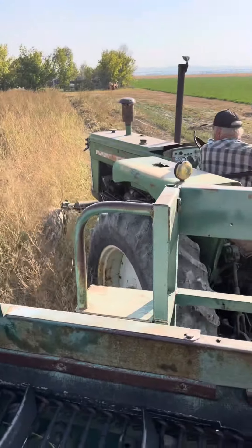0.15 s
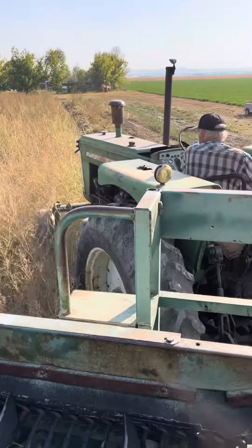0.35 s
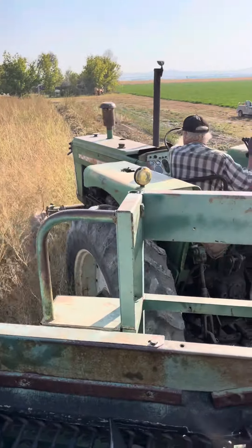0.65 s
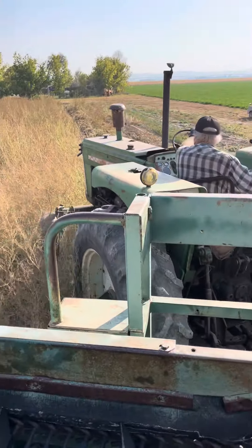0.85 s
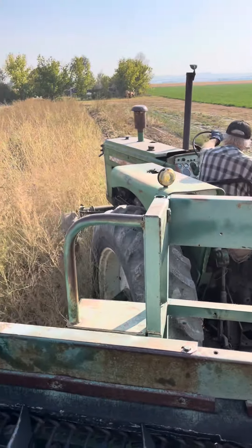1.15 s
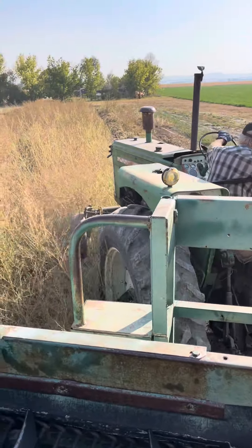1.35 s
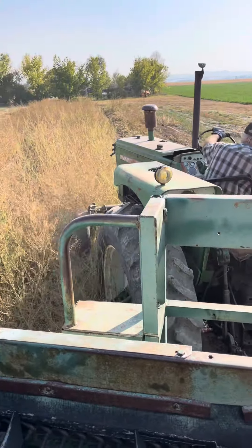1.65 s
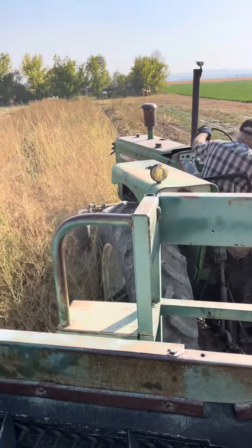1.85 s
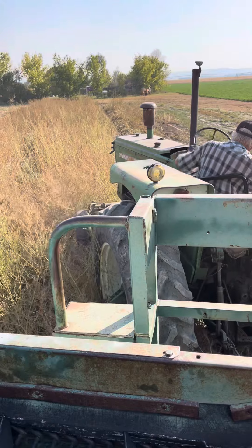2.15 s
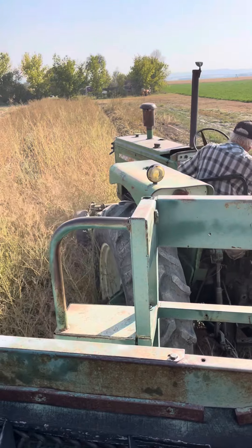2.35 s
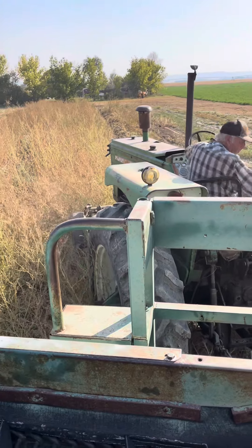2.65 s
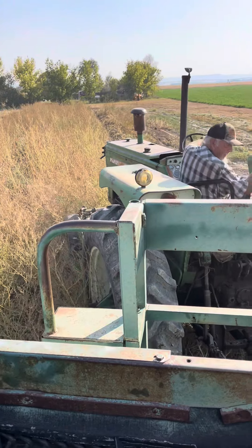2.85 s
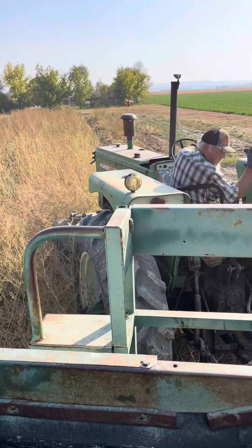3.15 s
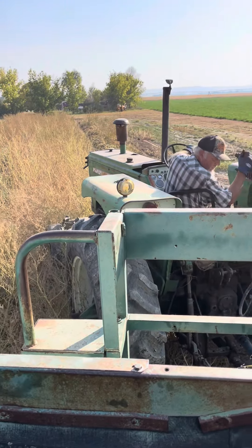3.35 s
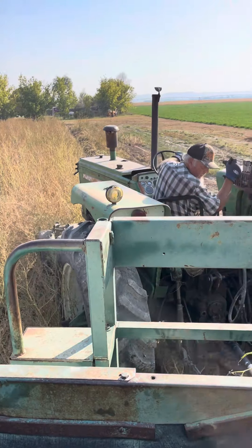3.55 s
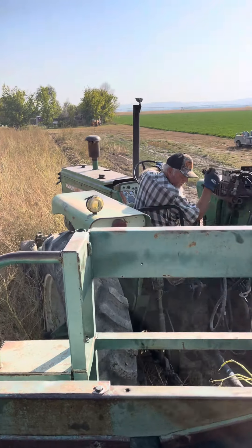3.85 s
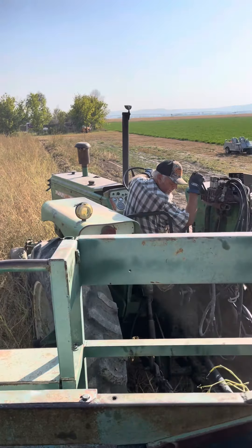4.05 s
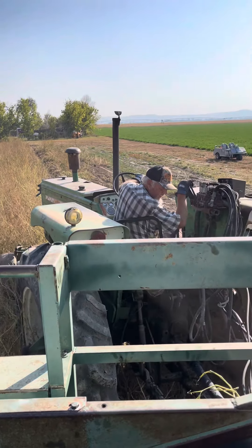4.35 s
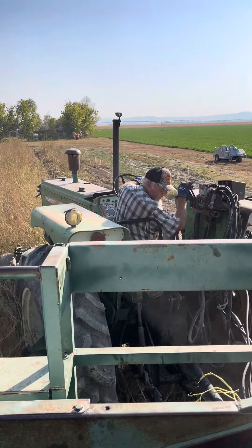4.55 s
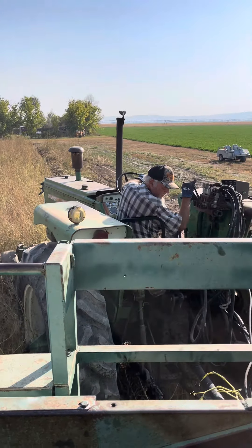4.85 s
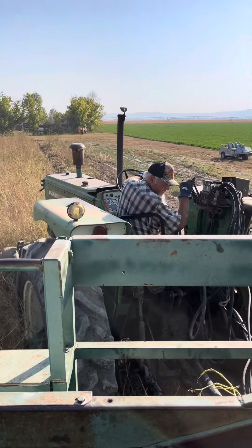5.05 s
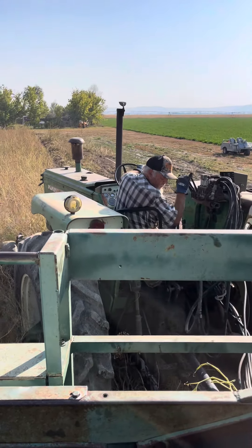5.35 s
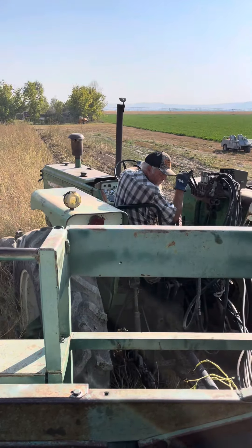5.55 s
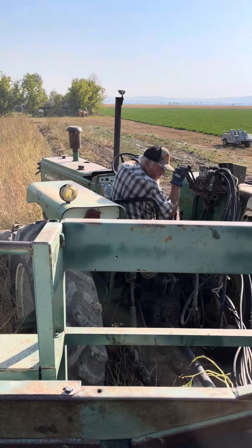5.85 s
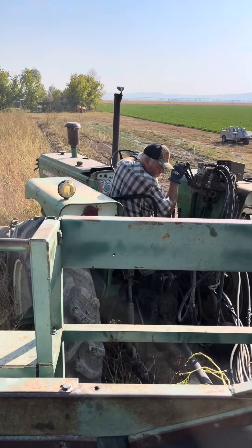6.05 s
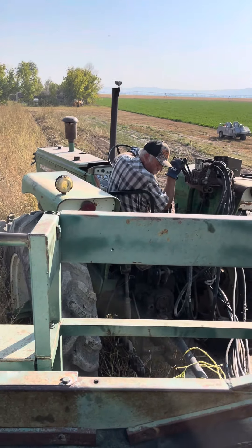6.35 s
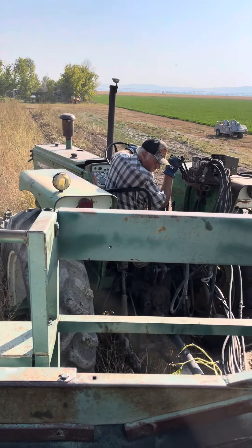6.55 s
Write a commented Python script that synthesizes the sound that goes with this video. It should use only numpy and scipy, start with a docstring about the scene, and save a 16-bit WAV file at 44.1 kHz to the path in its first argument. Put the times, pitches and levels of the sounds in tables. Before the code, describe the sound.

Steady, rough engine drone with fast uneven firing knocks, a hissing, chirping manifold leak and humming shaft. Sheet metal slaps early, the noise dips, then grows. A deep exhaust boom lasts under a second midway, faint joint squeaks follow, and a plate clanks with a hollow thump near the end. Close stereo microphone on the machine, outdoors and dry.

```python
"""An old six-cylinder tractor engine drones and throbs as it pulls a harvester, heard from the harvester's deck.
Sine waves and puffs of noise make the exhaust, which twice swells to a boom; firings knock in the block.
A leaking manifold chirps with falling tones and hisses in puffs of noise; shaft, fan and bearing hum as tones.
Random taps make the chain rattle, the stalks rustle and the loose covers chatter over rumbling, drumming noise.
The covers also slap, a dry joint squeaks, and near the end a plate clanks and the hopper thumps."""
import sys
import numpy as np
from scipy import signal
from scipy.fft import rfft, irfft, next_fast_len
from scipy.io import wavfile
from scipy.ndimage import uniform_filter1d

SR = 44100
rng = np.random.default_rng(int(sys.argv[2]) if len(sys.argv) > 2 else 0)


def store_wav(level_fs):
    """Save 16-bit WAV to argv[1]."""
    pcm = np.round(np.clip(np.atleast_2d(level_fs), -1, 1) * 32767)
    wavfile.write(sys.argv[1], SR, pcm.T.astype(np.int16))


N = 294837   # length in samples


def from_db(db):
    """Turn decibels into gain."""
    return 10 ** (np.asarray(db) / 20)


def mid_one(x):
    """Scale so that the mean of the channels has rms 1."""
    return x / np.sqrt(np.mean(np.atleast_2d(x).mean(0) ** 2) + 1e-20)


def in_time(rows):
    """Draw each column of a timed table as a curve, sample by sample."""
    start_s, *columns = np.transpose(rows)
    return [np.interp(np.arange(N) / SR, start_s, column) for column in columns]


def at_hz(points, hz):
    """Read a table by pitch, on a logarithmic pitch axis."""
    table_hz, value = np.transpose(points)
    return np.interp(np.log(hz + 1e-3), np.log(table_hz), value)


def drift(rate_hz):
    """Smooth random wandering of spread 1: noise smoothed twice, at one value per 40 samples."""
    step = 40
    memory = np.exp(-2 * np.pi * rate_hz * step / SR)
    noise = rng.standard_normal(N // step + 2002)
    slow = signal.lfilter([1], [1, -2 * memory, memory * memory], noise)[2000:]   # skip the settling
    return np.interp(np.arange(N) / step, np.arange(len(slow)), mid_one(slow))


def panned(left_db):
    """Left and right gains whose mean is 1; positive values favour the left."""
    gains = from_db(np.array([[.5], [-.5]]) * left_db)
    return gains / gains.mean(0)


# how far the left channel leads the right: pitch_hz, lead_rad
CHANNEL_LEAD = [(60, -.3), (76, -.45), (100, -.7), (150, -1.4), (240, -1.7), (340, -1.4), (460, -.5),
                (620, -.7), (800, 0), (2000, 0), (2600, 1.5), (4000, .6), (4600, 1.7), (5100, 4.6),
                (5700, 6.2), (6750, 6.4), (7670, 8.1), (8400, 9.3), (9500, 9.44), (10200, 10.2),
                (10600, 10.9), (11400, 11.5), (11900, 12.5)]


def channel_lead(hz):
    """Sound reaches the two channels out of step: half the lead goes to each side."""
    return at_hz(CHANNEL_LEAD, hz) * np.array([[.5], [-.5]])


# how alike the left and right channels are made: pitch_hz, likeness (0-1, share of power)
CHANNEL_LIKENESS = [(60, .99), (140, .85), (250, .88), (440, .35), (560, .6), (800, .85), (960, .62),
                    (1450, .99), (2000, .98), (2600, .72), (4200, .7), (4900, .8), (5800, .98), (7400, .8),
                    (8200, .88), (8700, .999), (9500, .999), (10200, .85), (11800, .97)]


def radiate(force, colour, envelope=1):
    """Colour a force and send it to both channels, along with scattered sound of the same envelope."""
    size = next_fast_len(N, True)
    hz = np.arange(size // 2 + 1) * SR / size
    alike = np.clip(at_hz(CHANNEL_LIKENESS, hz), 0, 1)
    direct = rfft(mid_one(force) * envelope, size) * np.exp(1j * channel_lead(hz))
    scattered = rfft(rng.standard_normal((2, N)) * envelope, size)
    mixed = np.sqrt(alike) * direct + np.sqrt(1 - alike) * scattered
    # fade out beyond both ends of the colour table
    lowest_hz, highest_hz = colour[0][0], colour[-1][0]
    skirts = 1 / (1 + (hz / highest_hz) ** 4) / (1 + (lowest_hz / (hz + 1)) ** 4)
    gain = from_db(at_hz(colour, hz)) * skirts
    return mid_one(irfft(mixed * gain, size)[:, :N])


def tone(hz, level_db):
    """A sine of moving pitch, out of step between the two channels."""
    phase = 2 * np.pi * (np.cumsum(hz) / SR + rng.random())
    return np.sqrt(2) * from_db(level_db) * np.sin(phase + channel_lead(np.mean(hz)))


def ring(force, hz, t60_s):
    """A unit click sets a sine of height 1 ringing, which falls by 60 dB in t60_s."""
    decay, turn = from_db(-60 / (t60_s * SR)), 2 * np.pi * hz / SR
    return signal.lfilter([0, np.sin(turn)], [1, -2 * decay * np.cos(turn), decay * decay], force + 1e-18)


def struck(clicks, modes, scatter_db):
    """Every touch rings all the modes, each with a random strength of its own."""
    out, at = np.zeros(N), np.flatnonzero(clicks)
    chance = rng.standard_normal((len(at), len(modes)))
    for k, (hz, db, t60_s) in enumerate(modes):
        force = np.zeros(N)
        force[at] = clicks[at] * from_db(db + scatter_db * chance[:, k]) * (-1) ** k   # signs alternate
        out += ring(force, hz, t60_s)
    return out


def blows(rows):
    """Make one train of clicks for each level column of a table of blows."""
    start_s, *levels_db = np.transpose(rows)
    clicks = np.zeros((len(levels_db), N))
    clicks[:, (start_s * SR).astype(int)] = from_db(levels_db)
    return clicks


def taps(per_s, spread_db, most=3):
    """Random touches of uneven strength and either sign."""
    sizes = from_db(spread_db * np.minimum(rng.exponential(1, N), most)) * rng.choice([-1, 1], N)
    return (rng.random(N) < per_s / SR) * sizes


# relative strength of the six cylinders in firing order: level_db
CYLINDER_DB = [-3.5, 3, 4, -3.5, -5, 2.5]
HALF_CYLINDER_DB = .5 * np.array(CYLINDER_DB)   # a milder pattern for the knock and the chain


def bursts(firings, centre, width, depth, scatter_db, pattern_db=CYLINDER_DB):
    """One burst per firing over a steady bed; centre and width are shares of the firing period."""
    turn = firings - centre + 2.5   # the 2 keeps the count positive
    which, offset = turn.astype(int), turn % 1 - .5
    chance = rng.standard_normal(size=1024)
    strength = from_db(np.array(pattern_db)[(which - 2) % len(pattern_db)] + scatter_db * chance[which])
    return np.sqrt(1 + (depth * strength) ** 2 * np.exp(-(offset / width) ** 2))


def cyclic_force(firings, repeat, size=3500):
    """The same parts collide in every engine cycle, so a share of the force repeats; the rest is fresh."""
    place = firings / len(CYLINDER_DB) % 1 * size
    loop = np.interp(place, np.arange(size), rng.standard_normal(size))
    return np.sqrt(repeat) * mid_one(loop) + np.sqrt(1 - repeat) * rng.standard_normal(N)


# engine speed: start_s, firings_per_s
ENGINE_SPEED = [(0, 75.35), (1, 76.0), (2.2, 75.85), (2.8, 76.18), (3.4, 75.5), (4.9, 75.35), (5.5, 76.14),
                (6.69, 75.35)]


def engine_firings():
    """Count the firings so far, in fractions, by adding up the engine speed."""
    return .1 + np.cumsum(in_time(ENGINE_SPEED)[0]) / SR


# exhaust lines: multiple of the six-firing cycle, level_db (about the exhaust level)
EXHAUST_LINES = [(4, -22), (6, 4), (7, -17.5), (8, -13.5), (9, -11.5), (10, -13), (11, -34), (12, -5),
                 (13, -25), (14, -22.5), (15, -1.5), (16, -13), (18, -7), (19, -8.5), (20, -10), (24, -9)]
FIRING_WAVER, OVERTONE_WAVER = .05, .15   # wavering of the firing line and of the others (share, and radians)
BOOM_TOP_HZ = 182


def exhaust(firings, level_db, boom_db, overtone_share=0.22, left_db=-1.2):
    """The firing line leads; unequal cylinders add lines at multiples of the cycle, which make it throb."""
    out, cycle = np.zeros((2, N)), firings / len(CYLINDER_DB)
    for order, db in EXHAUST_LINES:
        hz = order * ENGINE_SPEED[0][1] / len(CYLINDER_DB)
        follow = 1 if hz < BOOM_TOP_HZ else overtone_share
        share = FIRING_WAVER if order == len(CYLINDER_DB) else OVERTONE_WAVER
        waver, slip = 1 + share * drift(6.0), share * drift(6.5)
        gain = from_db(db + level_db + follow * boom_db) * waver
        phase = 2 * np.pi * (order * cycle + rng.random()) + slip
        out += gain * np.sin(phase + channel_lead(hz))
    return np.sqrt(2) * out * panned(left_db)


# colour of the ragged gas at the stack: pitch_hz, level_db (relative, per Hz)
BLAST_COLOUR = [(45, -3), (75, -2), (120, -4), (165, -6), (200, 7), (245, -10)]


def blast(firings, level_db):
    """Gas leaves the stack in ragged puffs, which roughen the drone and roar in a boom."""
    puff = bursts(firings, centre=.5, width=.3, depth=1.5, scatter_db=2.5)
    return from_db(level_db) * radiate(rng.standard_normal(N), BLAST_COLOUR, puff)


# speed of the harvester's shaft: start_s, turns_per_s
SHAFT_SPEED = [(0, 31.5), (0.8, 31.7), (1.5, 32.35), (2.6, 31.8), (3.6, 31.95), (5.5, 32.15), (6.3, 32.1),
               (6.69, 31.5)]
# hum of the shaft: multiple of a turn, level_db (about the exhaust)
SHAFT_LINES = [(2, -7.5), (3, -3.5), (4, -13.5)]


def drive(exhaust_db, rumble_db):
    """The harvester's shaft and fan hum against the exhaust; a bearing whines thinly."""
    turns_hz, = in_time(SHAFT_SPEED)
    shaft = sum(tone(order * turns_hz, exhaust_db + db) for order, db in SHAFT_LINES)
    fan = tone(194.5 + 2.2 * drift(4), rumble_db - 1.2 + 2.5 * drift(3))
    bearing = tone(8266 + 6 * drift(6), -62 + 3 * drift(3))[0]   # the same on both sides
    return shaft + fan + bearing


# colour of the rumble: pitch_hz, level_db (relative, per Hz)
RUMBLE_COLOUR = [(20, -17), (40, -28), (62, -19), (100, -11), (150, -1), (200, 1.5), (240, 1.5),
                 (280, -8.5), (420, -19)]


def rumble(firings, level_db):
    """Low noise, a small share of which repeats in every engine cycle."""
    return from_db(level_db) * radiate(cyclic_force(firings, repeat=0.12), RUMBLE_COLOUR)


# drumming of the sheet-metal panels: start_s, level_db, left_right_db (positive is left)
PANEL_DRUMMING = [(0.0, -38.5, 2), (0.95, -46.5, 3), (1.15, -54, -4), (1.45, -54.5, -19), (2.0, -40.5, -12),
                  (2.9, -36, -8), (3.5, -36.5, -4), (4.05, -44, 5), (4.6, -44, 1), (5.0, -33.5, 0),
                  (5.5, -35, 3), (6.69, -28, 2.5)]
# colour of the panels: pitch_hz, level_db (relative, per Hz)
PANEL_COLOUR = [(190, 2.5), (270, 2.5), (320, -1), (385, 4), (440, -5.5), (510, -0.5), (600, -5)]


def panels(firings):
    """Sheet-metal panels drum along with the engine cycle."""
    level_db, left_db = in_time(PANEL_DRUMMING)
    drumming = radiate(cyclic_force(firings, repeat=0.37), PANEL_COLOUR)
    return from_db(level_db) * drumming * panned(left_db)


# colour of the machine's body: pitch_hz, level_db (relative, per Hz)
BODY_COLOUR = [(350, -51), (450, -21), (510, 1.5), (570, 0.5), (640, 1.5), (700, -0.5), (790, 1), (880, 1),
               (960, -3), (1200, -12)]


def body(firings, level_db):
    """The body rattles as noise with a slight thud at each firing."""
    thud = bursts(firings, centre=0.44, width=0.45, depth=0.13, scatter_db=3.0)
    return from_db(level_db) * radiate(cyclic_force(firings, repeat=0.25), BODY_COLOUR, thud)


# level of the combustion knock: start_s, level_db (before the jolts)
KNOCK_LEVEL = [(0.0, -31), (0.6, -33), (1.25, -36.7), (1.5, -36), (1.9, -30.5), (2.6, -30.5), (3.4, -29.5),
               (4.1, -29), (4.6, -31), (5.0, -28.5), (5.55, -31), (5.85, -29.5), (6.69, -29)]
# colour of the knock: pitch_hz, level_db (relative, per Hz)
KNOCK_COLOUR = [(750, -42), (950, -28), (1010, -3), (1070, 1.5), (1155, 6), (1220, -1.5), (1370, 3),
                (1700, 1.5), (2150, -1.5), (2500, -5.5), (3100, -15.5), (4500, -21)]


def knock(firings, jolts_db):
    """Combustion knocks in the block, one burst of noise per firing."""
    level_db = in_time(KNOCK_LEVEL)[0] + jolts_db
    burst = bursts(firings, centre=.46, width=.24, depth=.9, scatter_db=.7, pattern_db=HALF_CYLINDER_DB)
    return from_db(level_db) * radiate(cyclic_force(firings, repeat=0.22), KNOCK_COLOUR, burst)


# ringing of the steel frame: pitch_hz, level_db (relative), t60_s
FRAME_MODES = [(368, -18, 0.083), (510, 3.5, 0.12), (548, 10.5, 0.027), (661, 6, 0.1), (753, 2.5, 0.035),
               (1005, 1, 0.18), (1175, 2.5, 0.06), (1290, 2, 0.17), (1381, -8, 0.032), (1650, -10, 0.033),
               (1710, -9, 0.014), (1880, -15, 0.014), (2243, 6.5, 0.032), (2626, -2, 0.068)]


def chain(firings):
    """Conveyor links tap the frame, mostly when a firing shakes them."""
    shake = bursts(firings, centre=.48, width=.2, depth=2.5, scatter_db=1, pattern_db=HALF_CYLINDER_DB) ** 2
    touches = taps(per_s=150 * shake / shake.mean(), spread_db=4)
    return mid_one(struck(touches, FRAME_MODES, scatter_db=4.5))


BODY_DB, BODY_FOLLOWS = -34.5, 0.59           # level at the usual effort, rise in dB per dB of effort
BODY_PAN_DB, BODY_PAN_FOLLOWS = -4.5, -0.45   # left-right balance: further right under effort


def clatter(firings, effort_db, jolt_db=0.7):
    """Panels, body, chain and block sound together, driven by the firings."""
    body_db = BODY_DB + BODY_FOLLOWS * effort_db
    jolts_db = jolt_db * drift(17.0)   # uneven ground shakes body and block together
    rattle = body(firings, body_db + jolts_db) + from_db(body_db - 3) * chain(firings)
    rattle_pan = panned(BODY_PAN_DB + BODY_PAN_FOLLOWS * effort_db)
    return panels(firings) + rattle * rattle_pan + knock(firings, jolts_db) * panned(-0.37)


# chatter of two loose covers: start_s, low_cover_level_db, bright_cover_level_db
COVER_CHATTER = [(0.0, -30, -31.5), (0.25, -34, -35), (0.7, -39, -39), (1.3, -38.5, -43), (1.9, -37.5, -37),
                 (2.7, -38.5, -41.5), (3.7, -35, -49), (4.4, -39, -51), (5.2, -35, -38.5), (6.0, -38, -38),
                 (6.69, -36, -50)]
# colour of the low cover: pitch_hz, level_db (relative, per Hz)
LOW_COVER_COLOUR = [(560, -9.5), (660, 0.5), (720, 1.5), (785, 7.5), (850, 6), (940, -13)]
# colour of the bright cover: pitch_hz, level_db (relative, per Hz)
BRIGHT_COVER_COLOUR = [(1600, -2), (1880, -1), (2030, -1), (2200, -0.5), (2500, -13.5)]


def covers(firings):
    """Two sheet-metal covers chatter with the firings, one with a low roar and one with a bright buzz."""
    low_db, bright_db = in_time(COVER_CHATTER)
    shake = bursts(firings, centre=0.48, width=0.28, depth=0.9, scatter_db=1.0)
    low = radiate(taps(per_s=900, spread_db=-0.5), LOW_COVER_COLOUR, shake)
    bright = radiate(taps(per_s=1200, spread_db=0.0), BRIGHT_COVER_COLOUR, shake)
    return from_db(low_db) * low + from_db(bright_db) * bright


# level of the rustle as the crop flows: start_s, level_db (before a fixed trim and flicker)
RUSTLE_LEVEL = [(0.0, -35.5), (0.5, -37), (0.95, -42), (1.4, -43), (1.9, -41.5), (3.1, -39.5), (4.0, -37),
                (4.55, -38), (5.0, -38), (6.1, -37), (6.69, -37)]
# colour of the rustle: pitch_hz, level_db (relative, per Hz)
RUSTLE_COLOUR = [(2000, -9), (2850, 5), (3200, 1), (3700, 1), (4300, 2), (4850, -2), (5400, 4.5),
                 (6200, 0.5), (7400, -4), (8500, -68)]


def rustle():
    """Dry stalks brush and snap against the machine in countless tiny clicks."""
    level_db = in_time(RUSTLE_LEVEL)[0] - 1.1 + 1.18 * drift(31)
    stalks = taps(per_s=3500, spread_db=2.5, most=4)
    return from_db(level_db) * radiate(stalks, RUSTLE_COLOUR)


# colour of the leak's hiss: pitch_hz, level_db (relative, per Hz)
HISS_COLOUR = [(5400, 10), (6300, 7), (7500, 7), (8300, 12), (9000, -24), (9700, 8.5), (10400, 3.5),
               (12000, -1), (12500, -27)]


def leak_hiss(firings, level_db):
    """Gas hisses through the leak, with a puff of noise at each firing."""
    puff = bursts(firings, centre=0.47, width=0.38, depth=1.13, scatter_db=1.6)
    return from_db(level_db + .5 * drift(15)) * radiate(rng.standard_normal(N), HISS_COLOUR, puff)


# relative strength of the whistle's octave on each cylinder, in firing order: level_db
OCTAVE_CYLINDER_DB = [1, 2.5, -0.5, 0, 4.5, 1.5]
# level of the whistle's octave, the highest treble: start_s, level_db (before a fixed trim and flicker)
OCTAVE_LEVEL = [(0.0, -36), (1.2, -35.5), (2.35, -36), (3.25, -40), (4.2, -39), (4.85, -37.5), (5.15, -38),
                (5.6, -37.5), (6.69, -37.5)]
# colour of the whistle: pitch_hz, level_db (relative, per Hz)
WHISTLE_COLOUR = [(4800, -2), (5200, 15), (5500, 14), (5800, 15.5), (6100, 2), (6700, -46)]
# colour of its octave: pitch_hz, level_db (relative, per Hz)
OCTAVE_COLOUR = [(9400, -35), (10200, 19), (10800, 24), (11300, 26), (11800, 19.5), (12400, -25)]
CHIRP_START, CHIRP_TOP_HZ = .13, 6090            # share of a firing; top pitch before smoothing and drift
CHIRP_SINK_HZ, CHIRP_SINK_HZ_PER_DB = 820, 50    # fall per firing, and extra fall on strong cylinders


def leak_whistle(firings, whistle_db):
    """Gas squeals through a manifold leak: each firing's pressure throws the pitch up, then it sinks."""
    which, age = np.divmod(firings - CHIRP_START, 1)
    strength_db = np.take(OCTAVE_CYLINDER_DB, which.astype(int), mode="wrap")
    sink_hz = CHIRP_SINK_HZ + CHIRP_SINK_HZ_PER_DB * strength_db
    chirp_hz = uniform_filter1d(CHIRP_TOP_HZ - sink_hz * age, size=190)   # rounds the jump up
    hz = chirp_hz * (1 + .009 * drift(120) + .005 * drift(15))
    phase = 2 * np.pi * np.cumsum(hz) / SR
    blow = bursts(firings, centre=.65, width=.3, depth=1.2, scatter_db=1.4)
    squeal = bursts(firings, centre=.64, width=.42, depth=2.0, scatter_db=1.3, pattern_db=OCTAVE_CYLINDER_DB)
    # each tone is mixed with breathy noise
    first = np.sqrt(2) * np.sin(phase) + 3.0 * rng.standard_normal(N)
    octave = np.sqrt(2) * np.sin(2 * phase) + 1.25 * rng.standard_normal(N)
    first_gain = from_db(whistle_db + 0.91 * drift(38))
    octave_gain = from_db(in_time(OCTAVE_LEVEL)[0] - 5.0 + 1.5 * drift(33))
    return (first_gain * radiate(first, WHISTLE_COLOUR, blow)
            + octave_gain * radiate(octave, OCTAVE_COLOUR, squeal))


# level of the leak, before it flickers: start_s, hiss_level_db, whistle_level_db
LEAK_LEVEL = [(0.0, -32, -44), (0.18, -34, -38), (0.6, -38.5, -53), (1.05, -40.5, -53), (1.5, -37, -54),
              (1.78, -34, -39), (2.35, -35.5, -37.5), (2.55, -36.5, -40.5), (3.55, -37.3, -34.5),
              (3.78, -38.5, -38), (4.55, -40.5, -42.5), (4.8, -35.5, -40), (5.6, -37, -41),
              (6.4, -36.5, -40), (6.69, -35, -36.5)]


def leak(firings):
    """The leak hisses and whistles in a limping pattern, as the cylinders differ in strength."""
    hiss_db, whistle_db = in_time(LEAK_LEVEL)
    return leak_hiss(firings, hiss_db) + leak_whistle(firings, whistle_db)


# hard slaps of the covers: start_s, low_cover_level_db, bright_cover_level_db
SLAP_BLOWS = [(0.180, -24, -29), (0.251, -16, -25), (0.569, -24, -26), (0.729, -21, -26), (4.371, -21, -31),
              (5.335, -16, -34)]
# ringing of the low cover: pitch_hz, level_db (relative), t60_s
LOW_COVER_MODES = [(675, -11, .04), (782, -7.5, 0.065), (850, -9, .04)]
# ringing of the bright cover: pitch_hz, level_db (relative), t60_s
BRIGHT_COVER_MODES = [(1640, -4, .03), (1880, 0.5, 0.049), (2060, -4, 0.069), (2200, -8, .03)]


def slaps():
    """Now and then both covers slap hard against their stops and ring."""
    on_low, on_bright = blows(SLAP_BLOWS)
    low = struck(on_low, LOW_COVER_MODES, scatter_db=1)
    return low + struck(on_bright, BRIGHT_COVER_MODES, scatter_db=3.5)


# swells of the exhaust: start_s, end_s (start of the fall), lift_db, deck_shudder_db
BOOM_SWELLS = [(3.052, 3.756, 10.5, 8.5), (6.163, 6.69, 8.5, 4.5)]
BOOM_ATTACK_S, BOOM_RELEASE_S = 0.24, 0.075
SHUDDER_AFTER_S, SHUDDER_S = 0.095, 0.15   # delay of the shudder's peak, time from peak to 1/e


def booms():
    """Each boom rises, holds and drops away; returns its lift and the deck's shudder at its onset, in dB."""
    t, lift_db, shudder_db = np.arange(N) / SR, 0, 0
    for start_s, end_s, db, jolt_db in BOOM_SWELLS:
        rise, fall = (t - start_s) / BOOM_ATTACK_S, 1 - (t - end_s) / BOOM_RELEASE_S
        lift_db += db * np.clip(np.minimum(rise, fall), 0, 1)
        shudder_db += jolt_db * np.exp(-((t - start_s - SHUDDER_AFTER_S) / SHUDDER_S) ** 2)
    return lift_db, shudder_db


# squeaks of a dry joint: middle_s, pitch_hz (before the wobble), level_db (at the peak)
JOINT_SQUEAKS = [(3.97, 2610, -38), (4.18, 2700, -39), (6.02, 2810, -42)]
SQUEAK_S = .11   # length between the points where it is down to 1/e


def squeaks():
    """A dry joint squeaks faintly, each time a short unsteady tone that swells and fades."""
    t = np.arange(N) / SR
    wobble = 1 + .006 * drift(40)
    return sum(tone(hz * wobble, db) * np.exp(-(2 * (t - middle_s) / SQUEAK_S) ** 2)
               for middle_s, hz, db in JOINT_SQUEAKS)


# jolts of the machine: start_s, plate_blow_level_db, hopper_blow_level_db
JOLT_BLOWS = [(6.446, -14.5, -22), (6.459, -13, -16.5), (6.485, -28, -18), (6.516, -24, -27),
              (6.532, -32, -27)]
# ringing of the loose plate: pitch_hz, level_db (relative), t60_s
PLATE_MODES = [(754, -5, 0.027), (1180, -14, 0.026), (1500, -6, 0.046), (1750, -9, 0.12), (1770, -16, 0.05),
               (2300, -13, 0.029)]
# ringing of the hollow hopper: pitch_hz, level_db (relative), t60_s
HOPPER_MODES = [(430, -6, 0.066), (515, 0, 0.084), (605, -7, .04)]


def clanks():
    """As the machine jolts, a loose steel plate clacks and the hollow hopper thumps with it."""
    on_plate, on_hopper = blows(JOLT_BLOWS)
    return struck(on_plate, PLATE_MODES, scatter_db=1.2) + struck(on_hopper, HOPPER_MODES, scatter_db=1.2)


# how hard the machines work; it drives exhaust, rumble, body and chain: start_s, effort_db (about the usual)
EFFORT_COURSE = [(0.0, 0), (0.25, -3.5), (0.6, -8.5), (1.05, -7.5), (1.3, -10), (1.46, -9.5), (1.62, -3.3),
                 (1.88, 0.7), (2.3, 4), (2.55, 2.5), (3.0, 5.5), (3.65, 5.5), (4.05, 1), (4.55, -3),
                 (4.9, 2), (5.25, 5.5), (5.55, 4.5), (5.85, 5.5), (6.2, 5), (6.69, 8)]
# slow waxing and waning of the bass apart from the effort: start_s, exhaust_db, rumble_db
BASS_SWAY = [(0.0, 1.5, -14), (0.6, 2, -1), (1.0, -2, -7), (1.7, -1, 3), (2.9, -1, -1.5), (3.9, -2, -7),
             (4.7, -1.8, -7), (5.4, -4, 5.5), (6.2, -2.5, -3.5)]
# level at the usual effort before sway (dB), and its rise (dB per dB of effort)
EXHAUST_DB, EXHAUST_FOLLOWS = -39.5, 0.96
RUMBLE_DB, RUMBLE_FOLLOWS = -45.5, 1.35
BLAST_DB = -10.5                                 # about the exhaust
BLAST_BOOM_SHARE, RUMBLE_BOOM_SHARE = 1.3, 0.19  # shares of a boom's lift in dB


def scene():
    """Engine and harvester sound together, with one effort behind exhaust, rumble, body and chain."""
    firings = engine_firings()
    effort_db, = in_time(EFFORT_COURSE)
    exhaust_sway_db, rumble_sway_db = in_time(BASS_SWAY)
    boom_db, shudder_db = booms()
    exhaust_db = EXHAUST_DB + EXHAUST_FOLLOWS * effort_db + exhaust_sway_db
    blast_db = exhaust_db + BLAST_DB + BLAST_BOOM_SHARE * boom_db
    rumble_db = RUMBLE_DB + RUMBLE_FOLLOWS * effort_db + rumble_sway_db
    rumble_db = rumble_db + RUMBLE_BOOM_SHARE * boom_db + shudder_db
    stack = exhaust(firings, exhaust_db, boom_db) + blast(firings, blast_db)
    lows = stack + drive(exhaust_db + boom_db, rumble_db) + rumble(firings, rumble_db)
    steady = lows + clatter(firings, effort_db) + covers(firings) + rustle() + leak(firings)
    return steady + slaps() + squeaks() + clanks()


def record(dry):
    """Cut the top steeply: 60 dB down from 13200 Hz upwards."""
    return signal.sosfilt(signal.cheby2(16, 60, 13200, fs=SR, output="sos"), dry)


dry = scene()
out = record(dry)
store_wav(out)
```